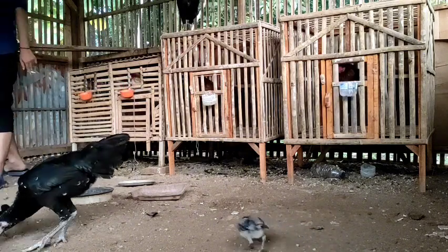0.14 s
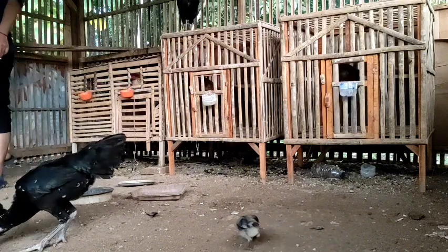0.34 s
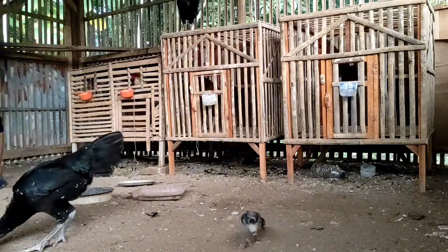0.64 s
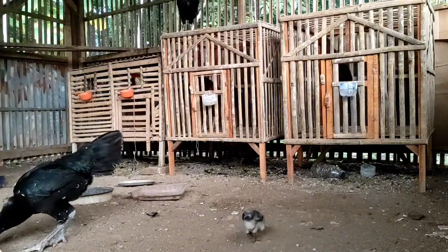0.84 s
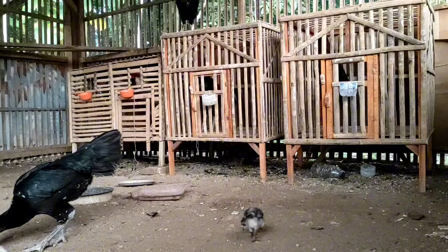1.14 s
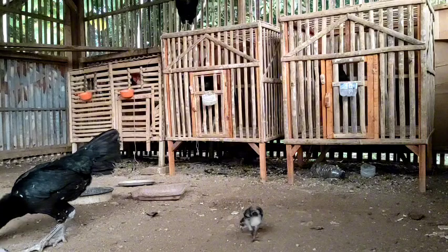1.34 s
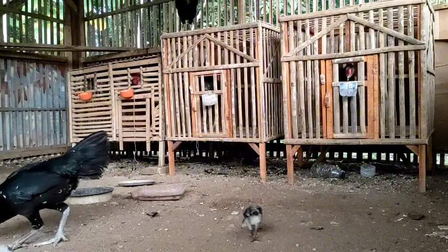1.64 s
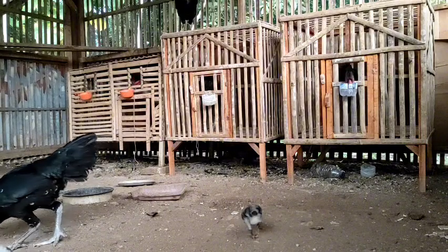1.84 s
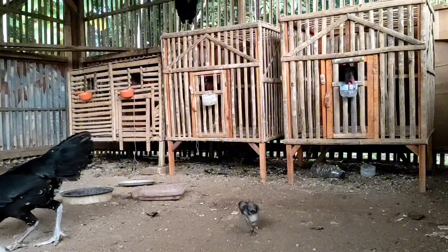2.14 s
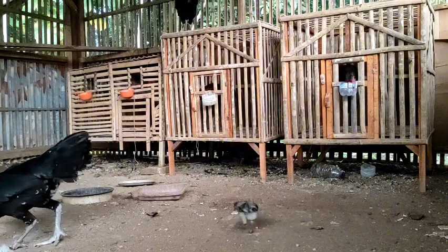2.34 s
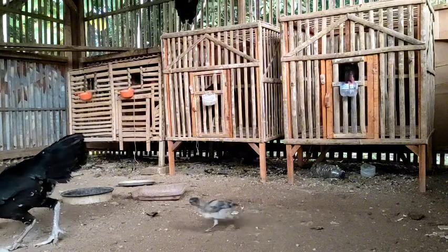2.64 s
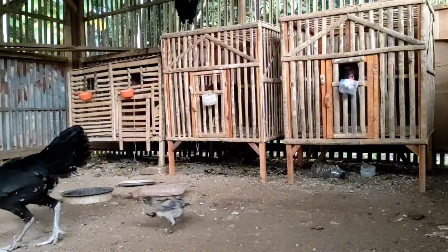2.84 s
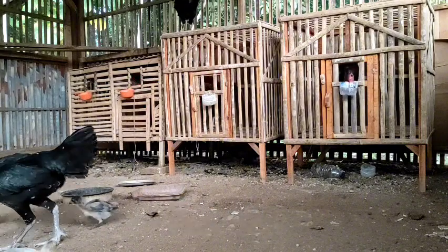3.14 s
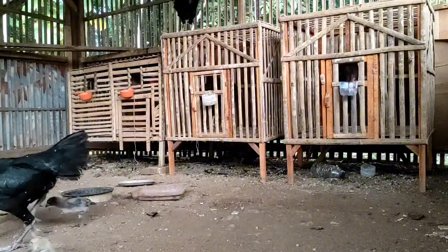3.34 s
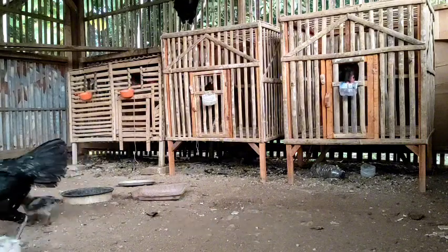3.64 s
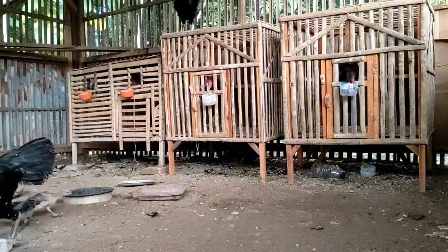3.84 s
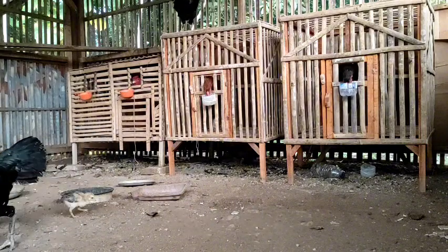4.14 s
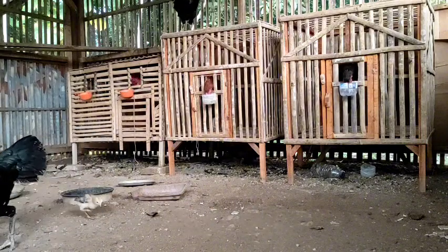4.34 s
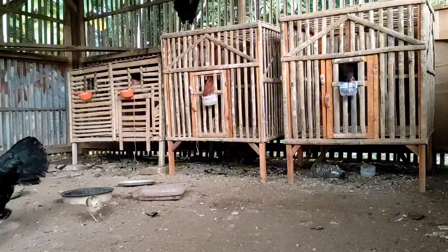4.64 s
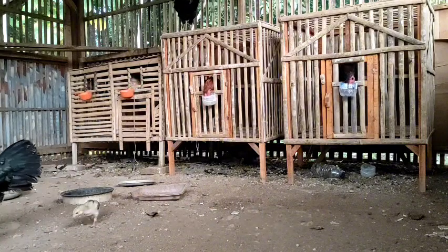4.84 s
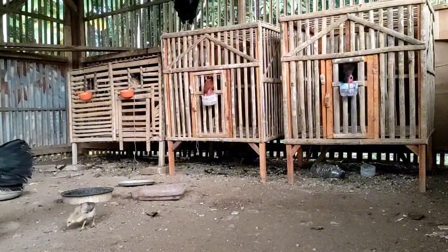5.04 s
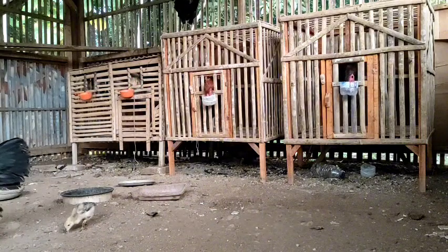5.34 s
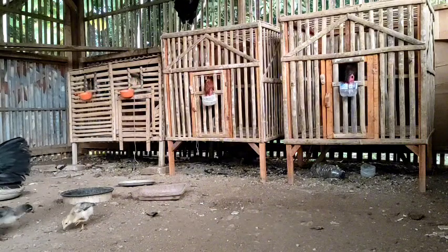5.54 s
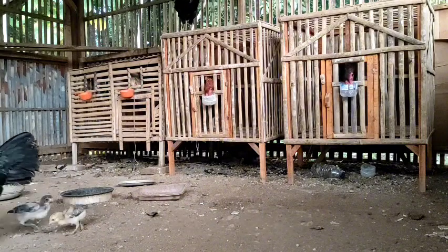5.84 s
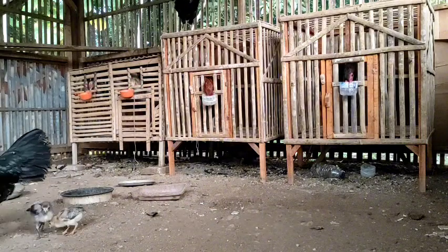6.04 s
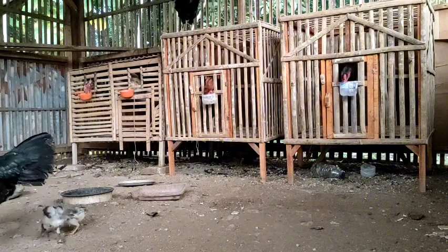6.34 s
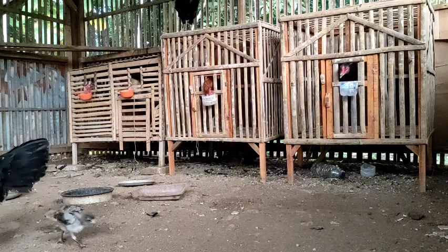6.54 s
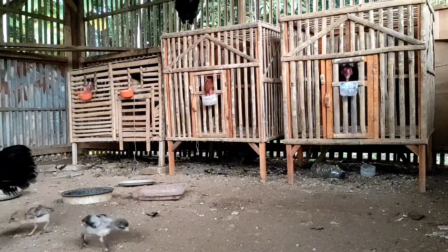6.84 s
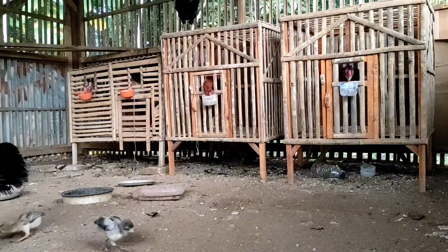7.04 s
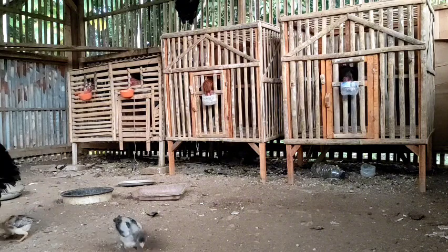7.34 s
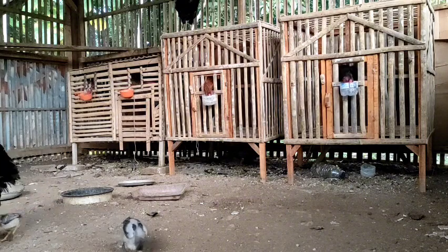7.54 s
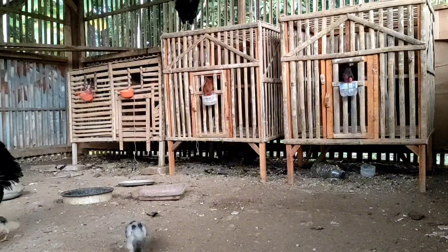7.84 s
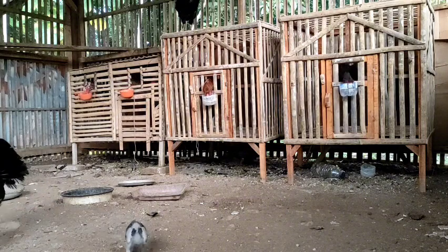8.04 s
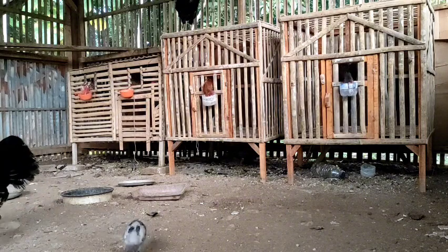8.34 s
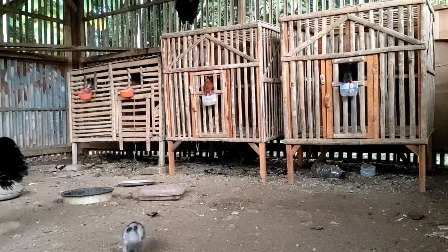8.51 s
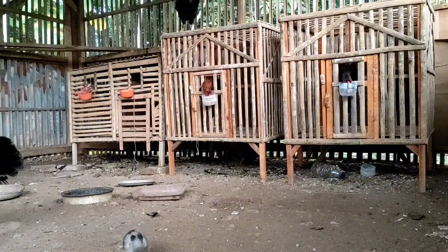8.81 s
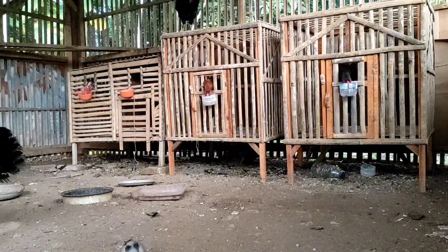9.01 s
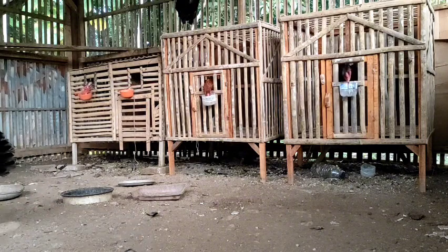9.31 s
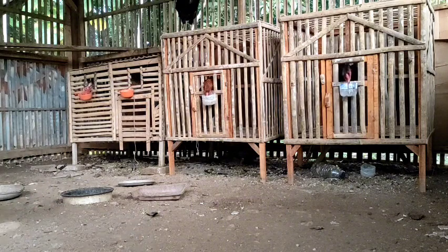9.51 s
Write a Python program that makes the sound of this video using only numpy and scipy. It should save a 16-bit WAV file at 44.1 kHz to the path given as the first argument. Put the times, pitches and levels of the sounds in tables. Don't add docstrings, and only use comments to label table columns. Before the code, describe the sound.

A close stereo phone pickup in a dirt-floored chicken shed, about 9.7 seconds, with short wooden reflections, low distant traffic and faint rustling throughout. From 0 to 2 seconds many chicks peep in very short, thin gliding whistles, with light claw scratches and low grumbling clucks from about 1. At 2.6 and 3.4 loud hollow feeder knocks land among clustered clucks and sharper dirt scratches; a soft broom drag starts near 3, and a far bird moans low. From 4 a hen clucks steadily, roughly three times a second. Loud gritty broom strokes come at 4.7 and 5.5, softer ones at 6.0 and 6.6; a fainter, higher moan passes around 5. From 7 to the end peeps thin somewhat, clucks continue, a strong scratch hits at 7.9, and hollow pecks ring repeatedly between 7.4 and 9.3.

```python
import sys
import numpy as np
from scipy import signal
from scipy.fft import rfft, irfft, next_fast_len
from scipy.io import wavfile
from scipy.ndimage import uniform_filter1d, map_coordinates

SR = 44100
rng = np.random.default_rng(int(sys.argv[2]) if len(sys.argv) > 2 else 0)


def nominal_scale(level):
    x = np.asarray(level, float) / 20
    return 10 ** x


def dump_mix(stems):
    frames = np.atleast_2d(stems).T
    limited = np.clip(frames, -1, 1)
    pcm = np.round(limited * 32767).astype(np.int16)
    wavfile.write(sys.argv[1], SR, pcm)


N = 426447

# time in seconds, rumble level in dB, rustle level in dB.
YARD_LEVELS = [(0, -40.5, -40.5), (5.5, -40, -40.5), (9.67, -39.5, -40.5)]
# frequency in Hz, density in dB per Hz.
RUMBLE_COLOUR = [(21, -36), (35, 1.5), (86, -4), (183, 3.5), (213, 0), (291, -7.5), (700, -21), (910, -75),
                 (1540, -120)]
RUSTLE_COLOUR = [(250, -77), (400, -4.5), (1900, -14), (3000, -9.5), (5000, -21), (7500, -2), (9000, -14),
                 (10500, -32.5), (15500, -33)]

DIP_SHAPE = [(0, 1.24), (.25, 1.06), (.5, 1), (.7, 1.06), (.85, 1.3), (1, 1.6)]
HOOK_SHAPE = [(0, .98), (.55, 1.04), (.75, 1.2), (1, 1.55)]
RISE_SHAPE = [(0, 1), (1, 1.3)]
FALL_SHAPE = [(0, 1.27), (.7, 1.04), (1, 1)]
DROP_SHAPE = [(0, 1.58), (.4, 1.55), (1, 1)]
LEVEL_SHAPE = [(0, 1.04), (1, 1)]
# start in seconds, length in seconds, lowest pitch in Hz, level in dB.
DIP_CALLS = [(0.465, 0.068, 2734, -34), (9.586, 0.066, 2880, -34.5)]
HOOK_CALLS = [(9.36, 0.05, 2640, -35.5)]
RISE_CALLS = [(1.223, 0.059, 2604, -33), (1.956, 0.037, 2336, -33.5), (3.935, 0.021, 2320, -41),
              (5.42, 0.05, 2320, -37), (7.979, 0.034, 2384, -33)]
FALL_CALLS = [(0.706, 0.045, 2690, -35), (1.898, 0.06, 2260, -38), (2.06, 0.048, 2540, -37),
              (2.456, 0.049, 2720, -37), (3.032, 0.13, 3570, -40), (3.085, 0.05, 2660, -35),
              (6.306, 0.067, 2270, -39), (6.77, 0.048, 2345, -37), (7.582, 0.075, 2395, -38),
              (7.687, 0.076, 2430, -43.5), (8.78, 0.053, 2776, -38), (9.075, 0.058, 2410, -36.5)]
DROP_CALLS = [(1.85, 0.063, 2760, -40.5), (2.452, 0.068, 2830, -38.5), (2.967, 0.044, 2680, -33.7),
              (8.913, 0.052, 2500, -50)]
LEVEL_CALLS = [(0.279, 0.03, 3380, -37), (0.831, 0.028, 2480, -34.5), (0.984, 0.045, 4076, -37.5),
               (1.045, 0.052, 2790.0, -33.5), (1.348, 0.061, 2630, -37), (2.831, 0.065, 2474, -37),
               (2.903, 0.038, 4380, -35.5), (3.196, 0.034, 4120, -37.5), (3.636, 0.053, 4070, -31.5),
               (4.324, 0.063, 3980, -40), (4.466, 0.065, 3926, -38), (6.22, 0.017, 2720, -34),
               (6.915, 0.038, 2626, -34.5), (7.612, 0.063, 2430, -38), (7.822, 0.054, 2763, -39.5),
               (7.865, 0.043, 2875, -37.5), (8.042, 0.043, 2740, -42.5), (8.241, 0.058, 2715, -33.5),
               (8.702, 0.043, 2637, -39.5), (8.908, 0.051, 2980, -37), (9.31, 0.053, 2520, -39)]
# start in seconds, start pitch in Hz, end pitch in Hz, level in dB.
SWOOP_CALLS = [(.745, 2870, 4000, -34), (.864, 2540, 3800, -33.5), (1.07, 2890, 3980, -34.5),
               (1.429, 2470, 4330, -35), (1.728, 2820, 5130, -35), (2.267, 3270, 2460, -26.5),
               (2.356, 2450, 4750, -27), (2.933, 2390, 4250, -32), (3.13, 2720, 3650, -29.5),
               (3.696, 3560, 2500, -30.5), (3.95, 2720, 3900, -28.5), (3.994, 3860, 2460, -31.5),
               (4.342, 4070, 2320, -31), (4.491, 4000, 2380, -29), (5.367, 3050, 3870, -35),
               (8.065, 2770, 4080, -39.5), (8.337, 2850, 3880, -36), (8.824, 2850, 4350, -41)]
# start in seconds, length in seconds, start pitch in Hz, end pitch in Hz, level in dB.
EARLY_SLIDES = [(0, 0.019, 3080, 2560, -33.5), (.045, 0.022, 2450, 3540, -42),
                (0.046, 0.024, 4450, 4400, -41), (0.069, 0.028, 4400, 3480, -42),
                (1.142, 0.069, 2860, 2450, -39.5), (.095, 0.039, 3180, 2730, -35),
                (.215, 0.069, 2590, 2370, -42), (.258, 0.036, 2430, 4500, -33),
                (.3, .055, 2540, 2370, -36.5), (.35, 0.025, 3300, 2700, -34.5),
                (.628, 0.031, 2280, 2170, -53.5), (.85, 0.033, 3920, 3330, -45),
                (1.34, 0.021, 2290, 2870, -39), (1.39, 0.043, 2520, 2360, -43.5),
                (1.543, 0.035, 2900, 2430, -39), (1.545, 0.063, 4000, 3440, -43),
                (1.655, 0.082, 3350, 2330, -38.5), (1.688, 0.066, 3046, 2680, -32.5),
                (1.688, 0.041, 4340, 3800, -40), (1.795, 0.035, 3070, 2560, -41),
                (2.322, 0.05, 4310, 4200, -40), (2.64, 0.059, 2610, 2900, -38),
                (2.7, 0.049, 3380, 2720, -41.5), (3.513, 0.066, 4280, 4080, -36),
                (3.65, 0.026, 3170, 2480, -33), (3.812, 0.021, 3200, 2550, -37),
                (3.875, 0.045, 3600, 2390, -37), (0.484, .045, 3430, 3290, -41.5),
                (.235, 0.025, 4450, 4450, -41), (4.19, 0.035, 4110, 3950, -42),
                (4.205, 0.039, 3900, 2310, -31), (4.232, 0.027, 2460, 2390, -39),
                (4.522, 0.059, 3200, 2520, -37), (4.53, 0.05, 4500, 4500, -51),
                (4.632, 0.018, 2830, 3700, -42), (4.652, .05, 3680, 2620, -38.5)]
LATER_SLIDES = [(4.972, 0.027, 3240, 2780, -42), (5.12, 0.042, 4000, 2430, -36.5),
                (5.304, 0.044, 2750, 2410, -36.5), (5.334, 0.025, 2870, 2900, -36),
                (5.418, 0.039, 3760, 3050, -46), (6.035, 0.02, 2810, 2890, -39),
                (6.078, 0.019, 2890, 2880, -36), (6.236, 0.042, 2810, 3810, -45.5),
                (6.15, 0.042, 2370, 2340, -37.5), (6.36, 0.1, 2880, 2900, -44.5),
                (6.448, 0.028, 2550, 2480, -29), (6.49, 0.047, 3740, 3650, -39),
                (6.35, 0.026, 3600, 2920, -39), (6.96, .04, 3340, 3470, -48),
                (6.488, 0.027, 4320, 4210, -37), (6.5, .035, 2620, 2340, -36.5),
                (6.976, 0.023, 2230, 2550, -41), (6.99, 0.041, 3050, 2710, -37.5),
                (7.061, 0.035, 3400, 2880, -37), (7.115, 0.05, 2740, 2750, -36),
                (7.131, 0.046, 2260, 2540, -34.5), (7.215, 0.049, 3210, 2830, -39),
                (7.27, .042, 1680, 1704, -48), (7.747, 0.042, 3310, 3020, -41),
                (7.779, 0.017, 2310, 2920, -36), (7.8, 0.033, 3000, 2770, -37),
                (8.11, .04, 4150, 4120, -48), (8.148, .025, 3140, 2570, -42),
                (8.232, 0.014, 2370, 2770, -40), (8.3, 0.042, 2660, 2490, -43),
                (8.49, 0.064, 3150, 2730, -39), (8.49, 0.078, 2337, 2530, -41.5),
                (8.565, 0.023, 2495, 3030, -34), (8.845, 0.025, 3050, 2420, -41),
                (8.93, 0.034, 2980, 2350, -42), (9.05, 0.049, 4240, 3830, -49),
                (9.149, .025, 2550, 3180, -42), (9.192, 0.062, 3560, 2790, -38),
                (9.233, .015, 2970, 2420, -33)]

# start in seconds, peak level in dB.
CLAW_SCRATCHES = [(.114, -28), (0.177, -24), (.849, -31.5), (1.004, -28), (1.352, -29.5), (1.525, -35.5),
                  (1.968, -22.5), (1.983, -24), (2.107, -25), (2.588, -20.5), (2.851, -31.5),
                  (2.8754, -16.5), (3.158, -21.5), (3.2805, -14.5), (3.579, -16.5), (3.837, -27.5),
                  (4.0758, -17), (4.421, -24), (5.2825, -25), (5.8172, -21), (5.362, -27.5), (5.431, -35),
                  (6.263, -25.5), (6.43, -25), (6.448, -19.5), (6.527, -25), (7.377, -25), (7.634, -32),
                  (8.034, -33.5), (8.737, -36), (7.92, -13.5), (8.177, -20.5), (8.26, -19.5), (8.3586, -27),
                  (8.414, -31.5), (8.582, -20), (8.6755, -29), (8.806, -25), (9.3019, -18), (9.404, -29)]
CLAW_SCUFFS = [(0.745, -31), (2.477, -31.5), (2.991, -21.5), (3.395, -15.5), (3.512, -17), (3.7686, -20),
               (3.9517, -27), (5.315, -27.5), (7.0424, -31), (7.149, -30), (7.321, -27), (7.421, -23.5),
               (7.618, -21.5), (8.464, -26.5), (8.98, -27.5), (9.532, -30)]
# time of full pressure in seconds, hold in seconds, peak level in dB, fade in dB per second.
BROOM_STROKES = [
    (2.983, 0.89, -34.5, 19),
    (3.25, 0.075, -26, 48),
    (4.73, 0.27, -14, 99),
    (5.537, 0.066, -13, 35),
    (6.015, 0.067, -23, 90),
    (6.617, .03, -18, 60.5),
]
# frequency in Hz, density in dB per Hz.
BRISTLE_COLOUR = [(1470, -22), (2500, -5.5), (4620, -12), (7530, 4), (8730, 1.5), (9890, -12.5),
                  (11200, -14.5), (15200, -20), (16000, -35)]
DRAG_COLOUR = [(200, -23), (500, 6.5), (1200, 6.5), (2300, 2), (3500, 3.5), (5500, 3), (9500, -56)]

# start in
# seconds, peak level in dB, ring in Hz, body level in dB relative to the ring.
FEEDER_KNOCKS = [(0.176, -32, 950, -4), (2.602, -3.5, 1004, -8.5), (3.392, -4, 930, 1.5),
                 (3.773, -11.5, 1294, -6), (5.818, -14, 920, -1), (7.636, -14, 1385, -10),
                 (8.802, -19.5, 520, -17), (6.722, -13.5, 1490, -20), (7.375, -15, 1230, -7),
                 (7.952, -10.5, 1107, -18), (8.269, -7.5, 1313, -31), (8.591, -8.5, 1286, -26),
                 (8.996, -14, 1313, -14.5), (9.315, -9.5, 1235, -27)]
# start in seconds, peak level in dB, beak resonance in Hz, throat level in relative dB.
GRUMBLING_CLUCKS = [(1.013, -19, 1100, 3.5), (1.411, -17.5, 805, 2.5), (1.954, -33, 1620, 1),
                    (2.109, -20.5, 900, -1), (2.576, -15.5, 1140, -1.5), (2.617, -24, 895, -5),
                    (2.875, -14, 1040, -2.5), (2.981, -24, 850, 3), (3.427, -13, 950, 4),
                    (3.539, -11, 1534, -4), (3.586, -21, 1620, -11), (3.645, -26, 980, -12),
                    (3.688, -22.5, 1030, -1), (3.943, -22.5, 960, 1.5), (4.22, -30.5, 875, -12),
                    (4.756, -26.5, 891, 14), (5.817, -14, 980, -5.5), (5.866, -25, 775, -9),
                    (8.799, -20.5, 1030, -3.5)]
# start in seconds, peak level in dB, throat level in relative dB.
STEADY_CLUCKS = [(4.069, -17, 2.5), (4.415, -15, -21), (4.697, -16, -9), (4.99, -15.5, -12),
                 (5.364, -25.5, -2), (6.15, -23.5, -5.5), (6.433, -20.5, -12), (6.712, -18.5, -14),
                 (7.035, -23, -6), (7.322, -15.5, -4.5), (7.614, -14.5, -20), (7.917, -37, -2),
                 (8.18, -20.5, -5.5), (8.481, -16, -4), (9.531, -18.5, -14.5)]
# time in seconds, pitch in Hz, level in dB.
CROON_CALLS = [
    [(2.98, 402.4, -33), (3.4, 417.5, -35.5), (3.9, 400, -38)],
    [(4.8, 652, -49), (5.1, 661, -40.5), (5.6, 648, -44)],
]

# frequency in Hz, 60 dB decay time in seconds.
SHED_DECAY = [(200, 0.34), (1000, 0.22), (3000, 0.22), (10000, 0.24)]
# frequency in Hz, left minus right in dB.
MICROPHONE_DIFFERENCE = [(60, 5), (200, 6), (1300, 2), (3000, -1), (5500, -4), (7000, -11), (9000, 6),
                         (11500, -0.5)]


def unit(x):
    return x / np.sqrt(np.mean(x ** 2) + 1e-20)


def along(points, hz):
    f, v = np.transpose(points)
    return np.interp(np.log(hz + 1), np.log(f + 1), v)


def curves(rows, outside=None):
    s, *columns = np.transpose(rows)
    return [np.interp(np.arange(N) / SR, s, column, outside, outside) for column in columns]


def wobble(rate):
    knots = rng.standard_normal(int(N * rate / SR) + 4)
    return map_coordinates(knots, [np.arange(N) * rate / SR])


def filtered(x, response):
    size = next_fast_len(x.shape[-1] + 4096)
    spectrum = rfft(x, size) * response(np.fft.rfftfreq(size, 1 / SR))
    return irfft(spectrum, size)[..., :x.shape[-1]]


def resonance(f, hz, width_hz):
    return 1j * f * width_hz / (hz * hz - f * f + 1j * f * width_hz)


def grit(colour, grain_db, alike=0.):
    sizes = nominal_scale(grain_db * np.minimum(rng.exponential(size=N), 4.5))
    grains = rng.standard_normal((2, N)) * sizes
    grains[1] = alike * grains[0] + np.sqrt(abs(1 - alike ** 2)) * grains[1]
    return unit(filtered(grains, lambda hz: nominal_scale(along(colour, hz))))


def add(track, s, sound, lag, pan_db):
    for side, sign in enumerate((.5, -.5)):
        start = max(0, round(s * SR + sign * lag))
        track[side, start:][:len(sound)] += nominal_scale(sign * pan_db) * sound


def yard():
    rumble_db, rustle_db = curves(YARD_LEVELS)
    rumble = nominal_scale(rumble_db + wobble(6.1)) * grit(RUMBLE_COLOUR, grain_db=-0.5, alike=0.91)
    stirring_db = 0.54 * wobble(3.09) + np.clip(2.7 * wobble(21), -6, 2.5)
    rustle = nominal_scale(rustle_db - 2.0 + stirring_db) * grit(RUSTLE_COLOUR, grain_db=-2.5)
    return rumble + rustle


def chick_calls():
    call_db, swoop_db, swoop_hz_per_s = 8.5, 4.5, 52000
    kinds = ((DIP_SHAPE, DIP_CALLS), (HOOK_SHAPE, HOOK_CALLS), (RISE_SHAPE, RISE_CALLS),
             (FALL_SHAPE, FALL_CALLS), (DROP_SHAPE, DROP_CALLS), (LEVEL_SHAPE, LEVEL_CALLS))
    calls = []
    for shape, rows in kinds:
        for s, length, low, db in rows:
            calls.append((s, length, np.transpose(shape) * [[1], [low]], db + call_db))
    for s, start, end, db in SWOOP_CALLS:
        span = abs(end - start)
        glide = [0, .5, 1], [start, min(start, end) + .36 * span, end]
        calls.append((s, span / swoop_hz_per_s, glide, db + swoop_db))
    for s, length, start, end, db in EARLY_SLIDES + LATER_SLIDES:
        calls.append((s, length, ([0, 1], [start, end]), db + call_db))
    return calls


def chicks():
    calls = chick_calls()
    track, flutter = np.zeros((2, N + SR)), wobble(100)
    places = rng.uniform(-1, 1, (len(calls), 2))
    for (s, length, glide, db), place in zip(calls, places):
        u = np.linspace(0, 1, round(length * SR))
        shake = np.resize(flutter[round(s * SR):], len(u))
        smooth_hz = uniform_filter1d(np.interp(u, *glide), size=len(u) // 8, mode="nearest")
        hz = smooth_hz * (1 + .012 * shake)
        phase = 2 * np.pi * np.cumsum(hz) / SR
        overtone = nominal_scale(np.minimum(13 - hz / 110, -12)) * np.sin(2 * phase)
        swell = abs(np.sin(np.pi * u)) ** 0.5 * nominal_scale(db + 3.07 * np.roll(shake, 200))
        add(track, s, swell * (np.sin(phase) + overtone), 22 * place[0], 3 * place[1])
    return track[:, :N]


def claw_power():
    power, t = np.zeros(N + SR), np.arange(SR // 2) / SR
    for strokes, t60_s in ((CLAW_SCRATCHES, 0.23), (CLAW_SCUFFS, 0.47)):
        for s, db in strokes:
            stroke = (1 - np.exp(-t / 0.0011)) * nominal_scale(db - 2.5 - 60 * t / t60_s)
            power[round(s * SR):][:len(t)] += stroke ** 2
    return power[:N]


def broom_power():
    press_db_per_s, bow_db, drag_db, drag_growth = 286, 0.5, -27.5, 0.34
    hiss, drag = np.zeros(N), np.zeros(N)
    uneven_db = 0.68 * wobble(35) + 0.77 * wobble(140)
    for s, hold, db, fade in BROOM_STROKES:
        since = np.arange(N) / SR - s
        bow = bow_db * np.sin(np.pi * np.clip(since / hold, 0, 1))
        pressing = press_db_per_s * np.minimum(since, 0)
        hiss_db = db + bow + pressing - fade * np.maximum(since - hold, 0)
        contact = np.clip((hiss_db + 70.5) / 45, 0, 1)
        hiss += nominal_scale(hiss_db + uneven_db) ** 2
        drag += contact * nominal_scale(drag_db + drag_growth * hiss_db + uneven_db) ** 2
    return hiss, drag


def scraping():
    claws = claw_power()
    hiss, drag = broom_power()
    drag = drag + claws * nominal_scale(-2.5) ** 2
    claw_grit = filtered(grit(BRISTLE_COLOUR, grain_db=3.0), lambda hz: nominal_scale(-10.5 * (hz > 9800)))
    bright = np.sqrt(hiss) * grit(BRISTLE_COLOUR, grain_db=2.5)
    dull = np.sqrt(drag) * grit(DRAG_COLOUR, grain_db=3.0, alike=0.063)
    return bright + np.sqrt(claws) * claw_grit + dull


def feeder():
    track = np.zeros((2, N + SR))
    bounce = .5 * signal.unit_impulse(SR // 5, round(0.014 * SR))
    blow = signal.unit_impulse(SR // 5) + bounce
    for s, db, ring_hz, body_db in FEEDER_KNOCKS:
        def shell(f):
            pair = resonance(f, ring_hz, 110) + 1.9 * resonance(f, 1.064 * ring_hz, 61)
            click = nominal_scale(-16) * resonance(f, 2700, 2500)
            body = nominal_scale(body_db + 10.0) * resonance(f, 280, 310)
            return (pair + click - body) * resonance(f, 1070, 3700) ** 2

        knock = filtered(blow, shell)
        add(track, s, nominal_scale(db + 3.0) * knock / abs(knock).max(), 4, -1)
    return track[:, :N]


def hens():
    track, t = np.zeros((2, N + SR)), np.arange(SR // 6) / SR
    steady = [(s, db, 1111, throat_db) for s, db, throat_db in STEADY_CLUCKS]
    swell = (1 - np.exp(-t / 0.0034)) * np.exp(-(t / 0.025) ** 2)
    for s, db, beak_hz, throat_db in GRUMBLING_CLUCKS + steady:
        pulse_hz = 186 * (1 + 0.084 * rng.standard_normal()) * (1 - .6 * t)
        cycles = np.cumsum(pulse_hz) / SR + .95
        pulses = np.diff(np.floor(cycles), prepend=0.) * nominal_scale(rng.normal(0, 4.85, len(t)))
        breath = .075 * rng.standard_normal(len(t))

        def tract(f):
            throat = nominal_scale(throat_db + 9.0) * resonance(f, 465, 400) * resonance(f, 206, 210)
            upper = nominal_scale(-17.5) * resonance(f, 1970, 1140) - nominal_scale(-11.0) * resonance(f, 2700, 270)
            return (resonance(f, beak_hz, 165) - throat + upper) * resonance(f, 1745, 8550) ** 2

        cluck = filtered((pulses + breath) * swell, tract)
        add(track, s - .002, nominal_scale(db + 7.5) * cluck / abs(cluck).max(), 12, 0)
    return track[:, :N]


def croon():
    moan = np.zeros(N)
    for call in CROON_CALLS:
        hz, db = curves(call, -120)
        half_phase = np.pi * np.cumsum(hz * (1 + 0.025 * wobble(45))) / SR
        rough = np.sin(half_phase) + np.sin(3 * half_phase) + np.sin(4 * half_phase)
        moan += nominal_scale(db + 3 * wobble(22)) * (np.sin(2 * half_phase) + nominal_scale(-15.5) * rough)
    return moan


def shed(x, wet_db):
    wet, hop = np.zeros((2, N + SR)), SR // 4
    for start in range(0, N, hop):
        hz, t, z = signal.stft(rng.standard_normal((2, SR // 3)), SR, nperseg=256)
        z[1, hz < 450] = z[0, hz < 450]
        decay = nominal_scale(-60 * t / along(SHED_DECAY, hz)[:, None])
        tail = signal.istft(z * decay, SR, nperseg=256)[1]
        answer = signal.fftconvolve(x[:, start:start + hop], tail / np.linalg.norm(tail[0]), axes=1)
        wet[:, start + 250:][:, :answer.shape[1]] += answer
    return x + nominal_scale(wet_db) * wet[:, :N]


def scene():
    brood = shed(chicks(), wet_db=0.2)
    flock = shed(feeder() + hens(), wet_db=-1.5)
    return yard() + brood + scraping() + flock + croon()


def band_limit(x):
    return signal.sosfilt(signal.butter(12, 16130, fs=SR, output="sos"), x)


def record(dry):
    sides = np.array([[.5], [-.5]])
    ports = filtered(dry, lambda hz: nominal_scale(along(MICROPHONE_DIFFERENCE, hz) * sides) * (hz < 16100))
    return band_limit(.9 * np.tanh(ports / .9))


dry = scene()
out = record(dry)
dump_mix(out)
```